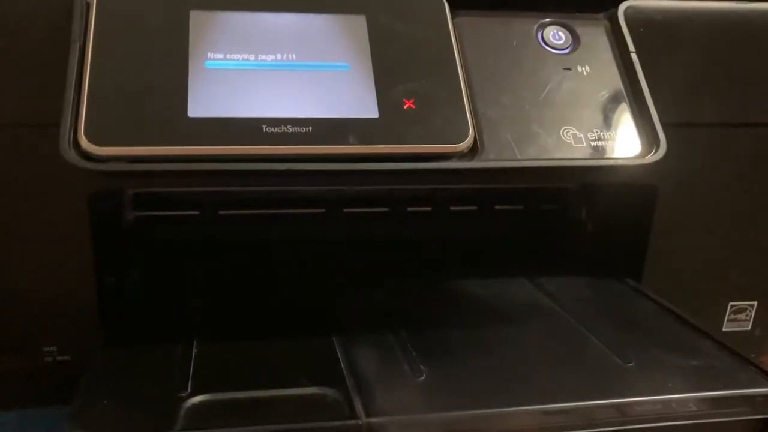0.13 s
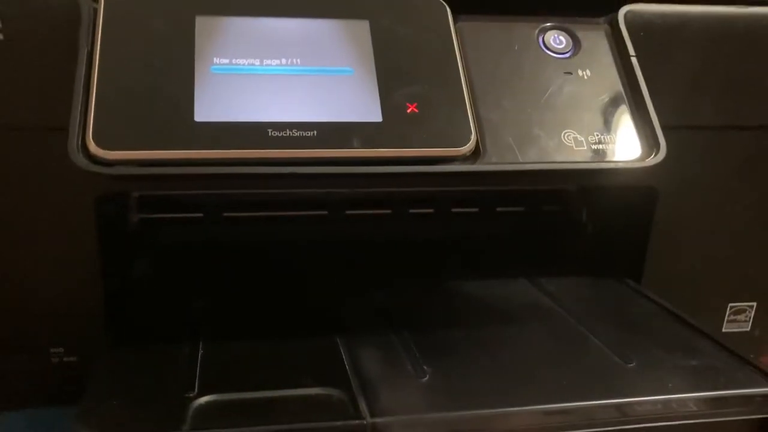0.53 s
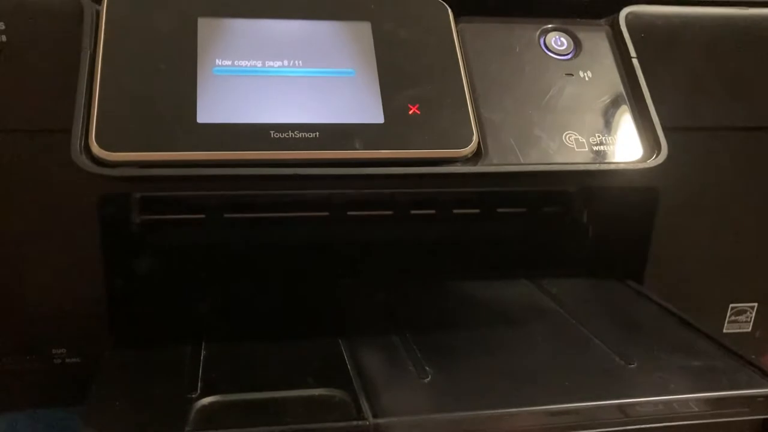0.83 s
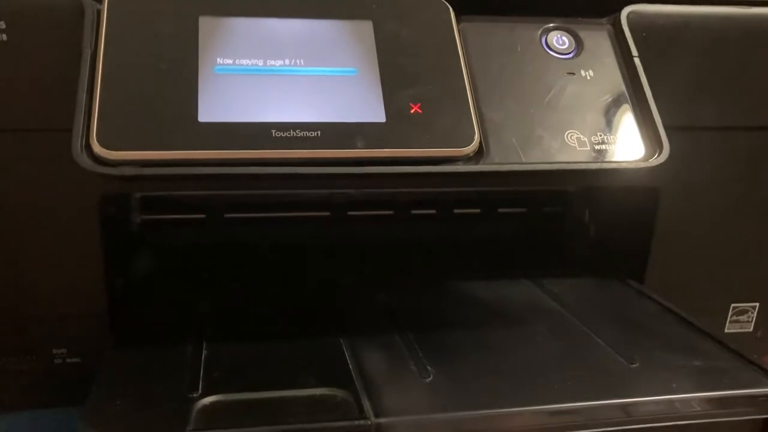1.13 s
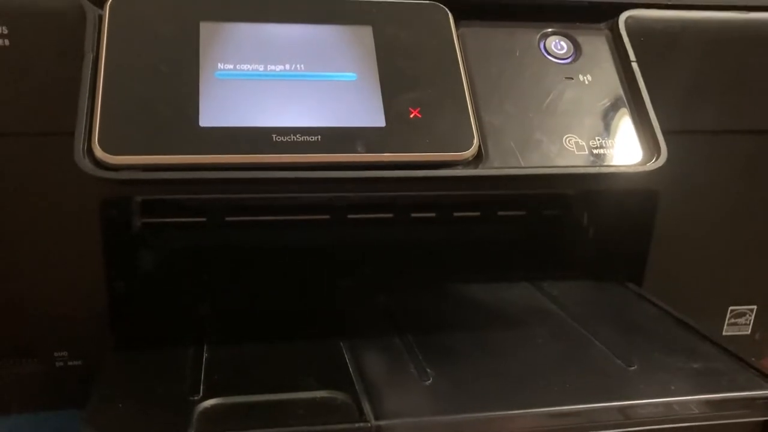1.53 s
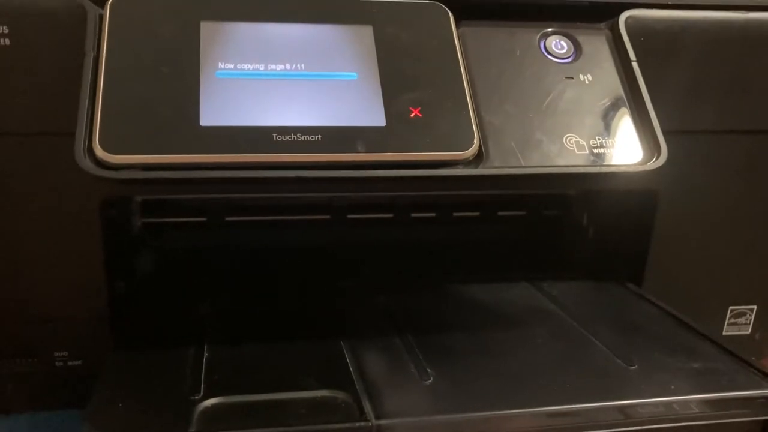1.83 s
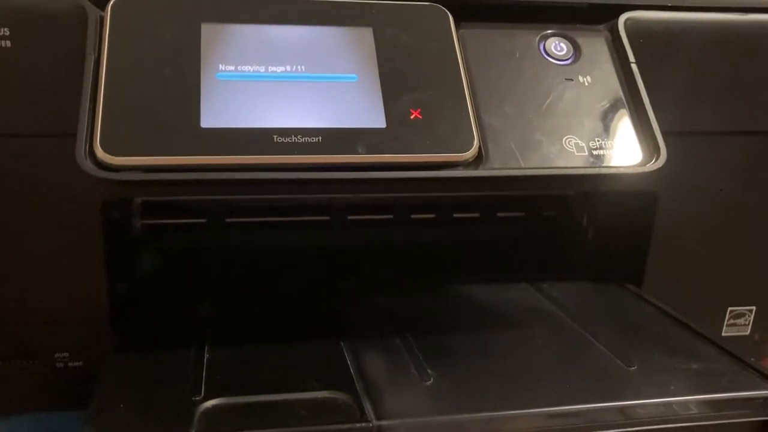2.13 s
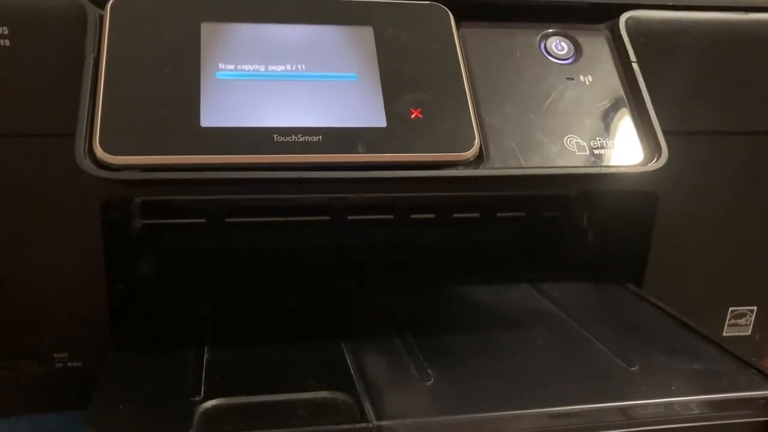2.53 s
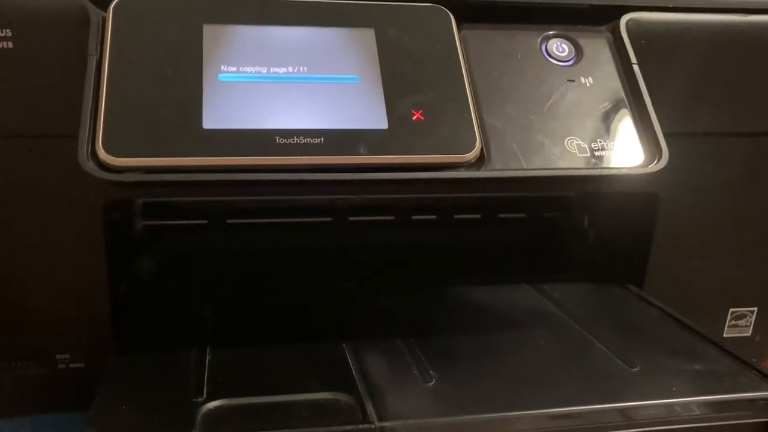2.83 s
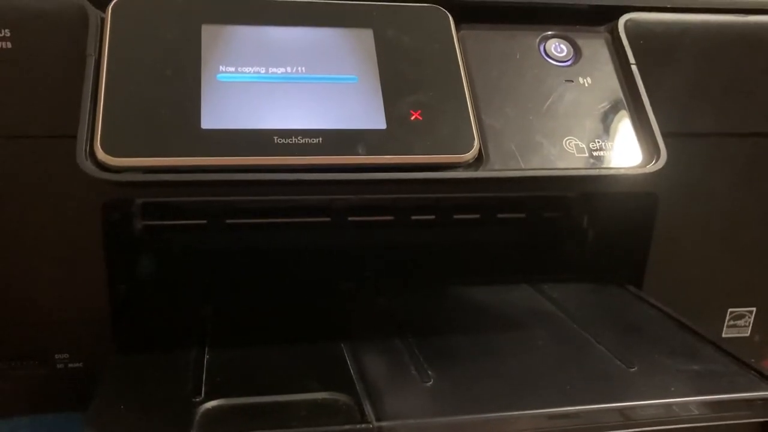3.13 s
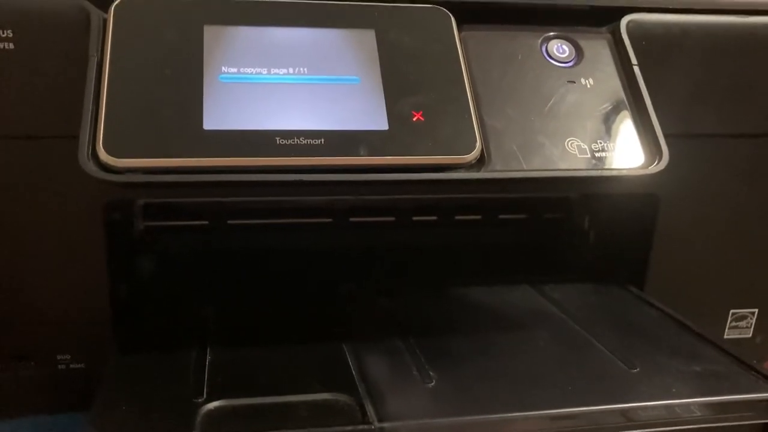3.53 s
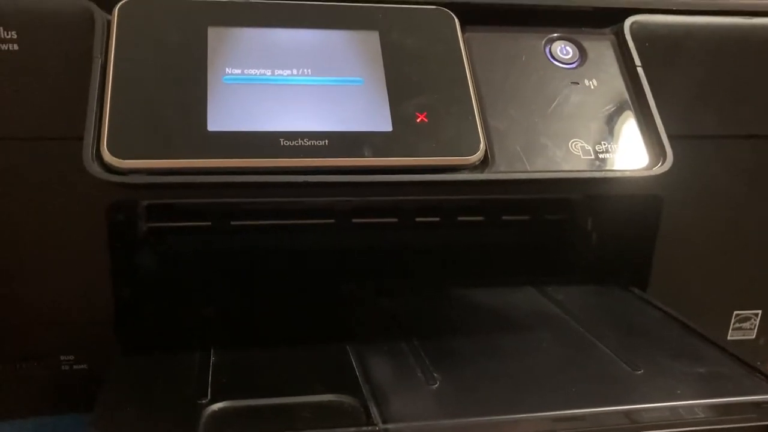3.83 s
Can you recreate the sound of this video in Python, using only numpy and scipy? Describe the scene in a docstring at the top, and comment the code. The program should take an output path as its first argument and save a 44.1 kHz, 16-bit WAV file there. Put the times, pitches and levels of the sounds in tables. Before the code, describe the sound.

A desktop printer chatters, runs down, pauses, then restarts with crunches, snaps and rasping strokes.

```python
"""A desktop printer miked close up in a quiet room, with a low hum throughout. Its gear train feeds a sheet
amid knocks and tray booms, then runs down; a faint scuff follows in the pause. It restarts with a light
rattle, shoves hard against a jam with crunches and plastic snaps, then rasps to and fro in groups of three
strokes. Contacts are noise bursts and grains coloured by the plastic case, scrapes and hum are resonant
noise, and hum tones are sines. Two ports pick it up, the left one leading in phase in the middle band."""
import sys
import numpy as np
from scipy import signal
from scipy.fft import rfft, irfft, next_fast_len
from scipy.io import wavfile
from scipy.ndimage import uniform_filter1d, map_coordinates

SR = 44100
rng = np.random.default_rng(int(sys.argv[2]) if len(sys.argv) > 2 else 0)


def generate_wav(signal):
    """Clip the signal to [-1, 1] and save it as 16-bit WAV at the path in sys.argv[1]."""
    frames = np.transpose(np.atleast_2d(signal))
    scaled = np.clip(frames, -1, 1) * 32767
    pcm = np.round(scaled).astype(np.int16)
    wavfile.write(sys.argv[1], SR, pcm)


N = 176400

# the drive loads the chassis and it thrums: (peak t/s, half width/s, level/dB)
THRUMS = [(1.235, 0.038, -47), (1.72, 0.02, -44.5), (2.0, 0.15, -54.5), (2.48, 0.019, -46.5),
          (2.69, 0.021, -43), (3.175, 0.039, -37.5), (3.585, 0.012, -41), (3.655, 0.025, -38.5),
          (3.84, 0.036, -43)]
# spectrum of creasing paper: (f/Hz, level/dB)
PAPER_COLOUR = [(300, -17), (1500, -18), (4500, 4.5), (7000, -12.5), (11000, 14.5), (15000, -5.5)]
# spectrum of grinding gears and loose parts: (f/Hz, level/dB)
GEAR_COLOUR = [(120, 1), (420, -2), (650, -5.5), (1100, -3.5), (1450, -1), (2000, -3), (2400, 0),
               (3000, 0.5), (5000, -12), (9000, -15), (15000, -34)]
CATCH_RATE = 45  # mean catches of the gear teeth per s


def amp(db):
    """Decibels to gain."""
    return 10 ** (np.asarray(db) / 20)


def unit(x):
    """Scale to rms 1."""
    return x / np.sqrt(np.mean(x ** 2) + 1e-20)


def clock():
    """Time of each sample in seconds."""
    return np.arange(N) / SR


def grid():
    """Frequencies of the padded spectrum in Hz."""
    return np.fft.rfftfreq(2 * next_fast_len(N // 2 + SR // 4), 1 / SR)


def along(points):
    """(Hz, value) points read on a log frequency axis."""
    f, value = np.transpose(points)
    return np.interp(np.log(grid() + 1), np.log(f + 1), value)


def filtered(x, response):
    """x times a frequency response."""
    spectrum = rfft(x, 2 * len(response) - 2)
    return irfft(spectrum * response)[..., :N]


def wobble(rate):
    """A smooth random curve, rate knots a second."""
    return map_coordinates(rng.standard_normal(4096), [clock() * rate], mode="wrap")


def swells(rows):
    """Rounded rises and falls (peak s, half width s, dB), added in power."""
    power = 0
    for peak, width, db in rows:
        distance = np.abs((clock() - peak) / width)
        power = power + amp(db) ** 2 * np.exp(-2 * distance ** 1.56)
    return np.sqrt(power)


def resonant_noise(modes):
    """Noise in steep, narrow resonances (Hz, width Hz, dB), rms 1."""
    f = grid()
    gain = sum(amp(db) / (1 + ((f - hz) / width) ** 2) ** 1.09 for hz, width, db in modes)
    return unit(filtered(rng.standard_normal(N), gain))


def grains(rate, spread_db):
    """Tiny random contacts, rate per s, their sizes spread by spread_db, rms 1."""
    chance, size = rng.random(N), rng.exponential(size=N)
    push = rng.choice([-1, 1], N)
    return unit((chance < rate / SR) * push * amp(spread_db * np.minimum(size, 4)))


def catches(rate):
    """Brief bursts at uneven intervals and of uneven strength, rms 1."""
    t60 = .02  # s
    gap, size = rng.random((1024, 2)).T
    at = (np.cumsum(.2 + 1.6 * gap) * SR / rate).astype(int)
    inside = at < N
    hits = np.bincount(at[inside], (.5 + size)[inside], N)
    decay = signal.lfilter([1], [1, -amp(-60 / (t60 * SR))], hits)
    return unit(decay * rng.choice([-1, 1], N))


def shifting(x, depth_db):
    """The resonances shift as the parts move: slow random patches of gain, rms 1."""
    z = signal.stft(x, nperseg=512)[2]
    patches = uniform_filter1d(rng.standard_normal(z.shape), size=3, axis=0)  # over frequency
    patches = uniform_filter1d(patches, size=12, axis=1)  # over time
    moved = signal.istft(z * amp(depth_db * unit(patches)), nperseg=512)[1]
    return unit(moved[:N])


def in_case(x, spectrum):
    """Causal colour of a source and the plastic case resonances, at unit power gain."""
    # resonances of the plastic case: (f/Hz, width/Hz, boost/dB)
    case_modes = [(530, 83, -1), (621, 230, 5.5), (782, 79, 7), (874, 57, 8), (993, 37, 8.5), (1096, 38, 2),
                  (1240, 95, 3), (1479, 61, 7.5), (1583, 120, 6), (1920, 32, -4.5), (2250, 92, 4.5),
                  (2438, 170, 10), (3450, 510, 5), (4550, 1120, 3), (4820, 110, -2)]
    db = along(spectrum)
    for hz, width, boost in case_modes:
        db = db + boost / (1 + (2 * (grid() - hz) / width) ** 2)
    # folding the cepstrum gives minimum phase, so nothing sounds ahead of its contact
    cepstrum = irfft(np.log(unit(amp(db))))
    half = len(cepstrum) // 2
    fold = np.r_[1, np.full(half - 1, 2), np.zeros(half)]
    return filtered(x, np.exp(rfft(cepstrum * fold)))


def clicks(rows, t60, spectrum):
    """Short bursts of contact (s, dB) that die quickly in the plastic."""
    attack_s = .0005
    level = 0
    for start, db in rows:
        age = np.maximum(clock() - start, 0)
        fade = amp(db - 60 * np.minimum(age / t60, 2))
        level = level + fade * (1 - np.exp(-age / attack_s))
    return in_case(level * rng.choice([-1, 1], N), spectrum)


def hum():
    """The chassis drones throughout, more under load, with a faint whine and the air of the room."""
    # low resonances of the chassis: (f/Hz, width/Hz, hum level/dB, thrum level/dB)
    chassis_modes = [(61.6, 33, -6.5, -23), (85, 12.6, -0.5, -11), (119.6, 8.3, 0, -13),
                     (161.6, 4.8, -7, -6), (214, 21, -1, 2.5), (288, 14, -2, -7), (494, 120, -28.5, -7.5)]
    # spectrum of the room air: (f/Hz, level/dB)
    air_colour = [(20, -12), (50, -14), (300, 1), (570, 5.5), (740, -18.5), (1400, -19.5), (4000, -19),
                  (6000, -25.5), (12000, -25), (15000, -44.5)]
    idle = amp(-49.5) * resonant_noise([(hz, width, db) for hz, width, db, _ in chassis_modes])
    rumble = resonant_noise([(hz, width, db) for hz, width, _, db in chassis_modes])
    thrum = amp(-3.5) * swells(THRUMS) * rumble
    whine = amp(-86) * resonant_noise([(2340, 75, 0)])
    air = amp(-73.5) * unit(filtered(rng.standard_normal(N), amp(along(air_colour))))
    return idle + thrum + whine + air


def drifting_sines(rows, drift, rate):
    """Sines (Hz, dB) whose phases wander by drift radians, rate knots a second."""
    return sum(amp(db) * np.sin(2 * np.pi * hz * clock() + drift * wobble(rate)) for hz, db in rows)


def tones():
    """Slightly drifting hum tones, and chassis modes that swell under load."""
    # tones of the idling machine: (f/Hz, level/dB)
    idle_tones = [(118, -57), (158, -62), (217, -53.5)]
    # chassis modes that ring in a thrum: (f/Hz, level/dB)
    thrum_modes = [(213, -1.6), (288, 0.61)]
    idle = drifting_sines(idle_tones, .35, 5.02)
    ring = drifting_sines(thrum_modes, .86, 25)
    return idle + swells(THRUMS) * unit(ring)


def scuff():
    """One faint scuff in the pause: a swell of noise in two narrow bands."""
    # the scuff: (peak t/s, half width/s, level/dB)
    scuff_swells = [(1.445, .014, -77)]
    # its resonances: (f/Hz, width/Hz, level/dB)
    scuff_modes = [(3550, 150, 0), (4370, 210, -1)]
    return swells(scuff_swells) * resonant_noise(scuff_modes)


def rattle():
    """Loose parts tick on faintly from the restart: sparse grains in the case."""
    start_s, level_db = 1.7, -62
    return in_case(amp(level_db) * (clock() > start_s) * grains(650, -1), GEAR_COLOUR)


def booms():
    """The paper tray booms: swells of noise in its low resonances."""
    # booms: (peak t/s, half width/s, level/dB)
    boom_swells = [(.1, 0.026, -45), (.47, 0.064, -46), (.57, 0.012, -43), (.92, 0.031, -43),
                   (1.925, 0.049, -39.5)]
    # resonances of the tray: (f/Hz, width/Hz, level/dB)
    tray_modes = [(481, 13, -15.5), (541.6, 15, -6.5), (599, 12, -4.5)]
    return swells(boom_swells) * resonant_noise(tray_modes)


def scrapes():
    """The load peaks and a scrape sings in the case: swells of resonant noise."""
    # scrapes: (peak t/s, half width/s, level/dB)
    scrape_swells = [(1.917, 0.032, -35), (2.035, 0.018, -34), (2.145, 0.014, -31), (2.25, 0.028, -37),
                     (2.755, 0.036, -41.5), (3.275, 0.015, -34.5), (3.77, 0.028, -39)]
    # resonances they excite: (f/Hz, width/Hz, level/dB)
    scrape_modes = [(1333, 39, -13), (1450, 90, 4.5), (2210, 81, -3.5), (2370, 160, -2.5)]
    return swells(scrape_swells) * resonant_noise(scrape_modes)


def ticks():
    """Creasing paper ticks lightly: very short noise bursts."""
    # ticks: (t/s, level/dB)
    tick_rows = [(1.968, -45), (1.986, -31.5), (2.165, -34.5), (2.305, -27.5), (2.348, -34), (2.371, -43),
                 (2.386, -35), (2.4215, -43), (2.453, -51)]
    return clicks(tick_rows, .012, PAPER_COLOUR)


def knocks():
    """Rollers and gears knock dully: noise bursts with little treble."""
    # knocks: (t/s, level/dB)
    knock_rows = [(.485, -30), (.5602, -26), (.8978, -24.5), (1.022, -31), (1.692, -51), (1.698, -41),
                  (1.856, -29), (1.869, -29.5), (1.889, -23.5), (1.913, -22.5), (1.9425, -19), (2.02, -26),
                  (2.031, -23), (2.235, -24), (2.248, -24), (2.418, -45), (2.4515, -43), (2.609, -27),
                  (2.827, -34), (3.031, -32), (3.399, -25), (3.545, -29), (3.635, -28)]
    # their spectrum: (f/Hz, level/dB)
    knock_colour = [(120, -1.5), (550, 7), (1000, 4.5), (1600, 9), (3500, 3.5), (6000, -8.5),
                    (15000, -53.5)]
    return clicks(knock_rows, .032, knock_colour)


def snaps():
    """Slipping plastic snaps sharply: bright noise bursts."""
    # snaps: (t/s, level/dB)
    snap_rows = [(1.868, -24.5), (1.9422, -11), (2.1775, -30), (2.1892, -11), (3.0818, -21), (3.882, -23.5)]
    # their spectrum: (f/Hz, level/dB)
    snap_colour = [(200, -67), (1000, 1), (2300, 6), (3800, 15.5), (6000, 6), (10000, 2), (15000, -19)]
    return clicks(snap_rows, .017, snap_colour)


def feed():
    """The gear train chatters and catches, the sheet crinkles, then all runs down."""
    # spectrum of the feeding gear train: (f/Hz, level/dB)
    feed_colour = [(40, -60), (100, -20), (350, 2.5), (530, 1), (980, -8.5), (1300, 3), (1480, -3),
                   (1750, 1), (2500, -2.5), (2850, -4), (3300, -2), (4800, -2.5), (6300, -11), (7600, -5),
                   (9300, -15.5), (11800, -10), (15000, -31)]
    stop_s, level_db, rundown_db_per_s = 1.1615, -40.5, 613
    level = amp(level_db - rundown_db_per_s * np.maximum(clock() - stop_s, 0))
    gears = grains(5000, 2) + amp(-10) * catches(CATCH_RATE)
    crinkle = amp(-24) * catches(14)
    return in_case(level * gears, feed_colour) + in_case(level * crinkle, PAPER_COLOUR)


def jam():
    """The rollers shove against stuck paper, which crunches in dense grains."""
    # shoves: (peak t/s, half width/s, level/dB)
    shove_rows = [(1.893, 0.015, -36), (1.93, 0.014, -30), (1.965, 0.029, -40.5), (2.034, 0.027, -28.5),
                  (2.102, 0.0066, -35), (2.148, 0.028, -31.5), (2.205, 0.017, -43), (2.254, 0.039, -28.5)]
    # spectrum of the crunch: (f/Hz, level/dB)
    crunch_colour = [(150, -12.5), (420, -8.5), (540, -7), (950, -4.5), (1500, -1.5), (2000, -9.5),
                     (2900, -2), (4500, -0.5), (6300, -4), (9300, -6), (12000, -10), (15000, -20)]
    crunch = shifting(grains(6000, 3), 2)
    return in_case(swells(shove_rows) * crunch, crunch_colour)


def stroke(start, end, attack_s):
    """Engage with a jolt, speed up, hold, coast down."""
    t = clock()
    jolt, release_db_per_s = 0.086, 475  # jolt: share of full speed at the start
    speed = np.clip(jolt + (t - start) / attack_s, 0, 1)
    coast = amp(-release_db_per_s * np.maximum(t - end, 0))
    return (t > start) * speed * coast


def strokes():
    """Each stroke rasps brightly over a coarser grind of gears that catch at random."""
    # strokes of the drive: (start t/s, end t/s, rasp of the sliding parts/dB, grind of the gears/dB)
    stroke_rows = [(1.178, 1.189, -75, -48.5), (1.706, 1.75, -43, -43), (1.796, 1.814, -44.5, -44.5),
                   (2.334, 2.369, -40.5, -49), (2.402, 2.411, -43, -51), (2.486, 2.611, -34, -39),
                   (2.666, 2.78, -39.5, -38), (2.818, 2.912, -38, -40.5), (3.024, 3.149, -34, -40),
                   (3.181, 3.298, -40.5, -40), (3.32, 3.412, -38, -45.5), (3.521, 3.648, -36, -39.5),
                   (3.686, 3.803, -42, -40.5), (3.822, 3.908, -40.5, -40), (3.962, 4.053, -30.5, -45)]
    # spectrum of the rasp: (f/Hz, level/dB)
    rasp_colour = [(200, -8), (800, -10.5), (2000, -10.5), (3000, -7.5), (4700, 2.5), (6300, -2),
                   (9000, -5), (12000, -7), (15000, -25.5)]
    slide = sum(amp(db) * stroke(start, end, 0.039) for start, end, db, _ in stroke_rows)
    load = sum(amp(db) * stroke(start, end, 0.018) for start, end, _, db in stroke_rows)
    rasp = slide * shifting(grains(9000, 3), 4.5)
    gears = amp(1.2 * wobble(90)) * grains(1300, 0)
    grind = load * shifting(gears + amp(-4) * catches(CATCH_RATE), 4)
    return in_case(rasp, rasp_colour) + in_case(grind, GEAR_COLOUR)


def echo(x, t60):
    """x through a diffuse, decaying noise tail of unit energy."""
    t = np.arange(SR // 2) / SR
    tail = rng.standard_normal(len(t)) * amp(-60 * t / t60)
    return signal.fftconvolve(x, tail / np.linalg.norm(tail))[:N]


def printer():
    """All moving parts with the room's answer, over the hum."""
    # colour of the room: (f/Hz, level/dB)
    room_colour = [(300, 6.5), (2500, 3), (6000, 0.5), (15000, -16)]
    room_t60_s, room_db = 0.16, -10
    works = scuff() + rattle() + booms() + scrapes()
    works = works + ticks() + knocks() + snaps()
    works = works + feed() + jam() + strokes()
    room = filtered(echo(works, room_t60_s), amp(room_db + along(room_colour)))
    return works + room + hum()


def ports(direct, scatter):
    """Two microphone ports share the direct sound and hear the scatter in opposite phase."""
    # likeness of the ports: (f/Hz, likeness/0-1)
    likeness = [(100, .96), (280, .9), (650, .94), (1400, .88), (2400, .7), (3600, .5), (5800, .4),
                (7000, .85), (9200, .93), (14000, .9)]
    # left over right: (f/Hz, level/dB)
    balance = [(250, -1), (800, 0.5), (1200, 4.5), (2300, 2.5), (3500, 2), (6500, -0.5)]
    # phase lead of the left port: (f/Hz, lead/rad)
    left_lead = [(300, 0), (1000, .6), (2100, .5), (3100, 2.8), (4600, 5.6), (5400, 3.1), (6400, .3),
                 (7300, -.3), (9100, -3.1), (11300, -6.3), (13600, -9.4), (15500, -12.5)]
    turn = np.arccos(np.clip(along(likeness), 0, 1)) / 2
    shared = filtered(direct, np.cos(turn))
    apart = filtered(scatter, np.sin(turn))
    # each port takes half of the level and phase difference
    left = amp(along(balance) / 2) * np.exp(.5j * along(left_lead))
    return np.array([filtered(shared + apart, left), filtered(shared - apart, 1 / left)])


def scene():
    """The printer heard directly, and as unrelated scatter from its wide paper slot."""
    return ports(printer() + tones(), printer())


def record(dry):
    """The recorder drops the deepest bass and keeps nothing above its band limit."""
    low_cut_hz, top_hz = 53, 15800
    f = grid()
    return filtered(dry, (f < top_hz) / np.sqrt(1 + (low_cut_hz / (f + 1)) ** 8))


dry = scene()
out = record(dry)
generate_wav(out)
```